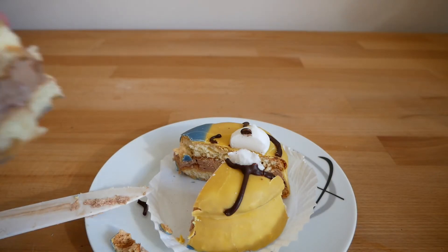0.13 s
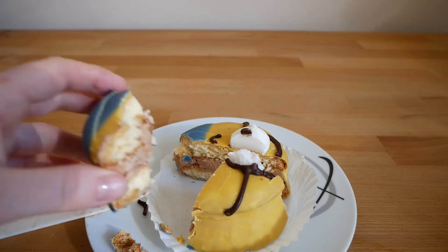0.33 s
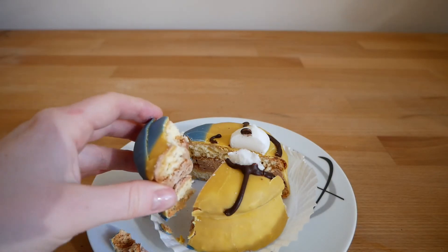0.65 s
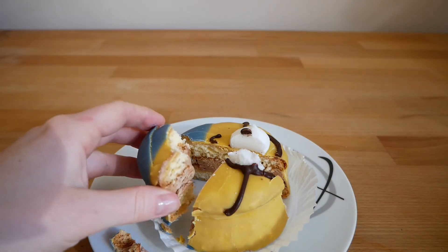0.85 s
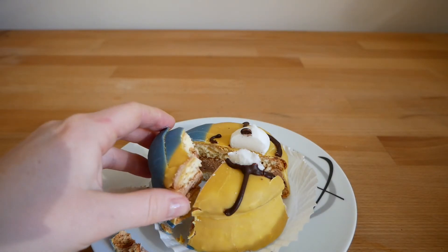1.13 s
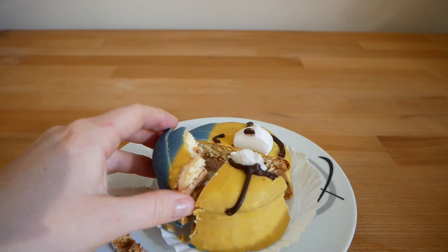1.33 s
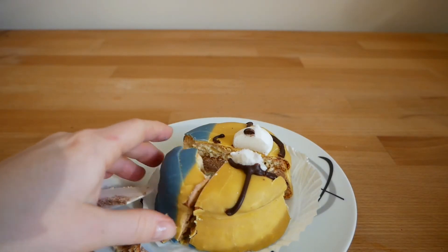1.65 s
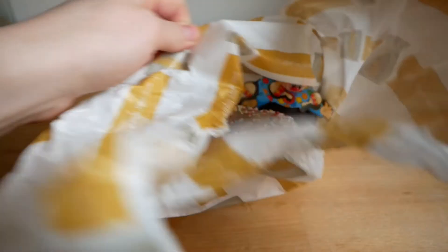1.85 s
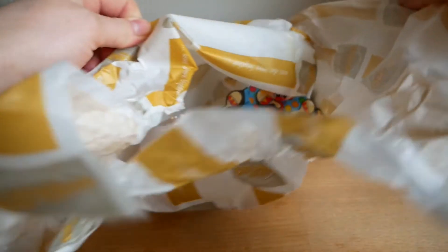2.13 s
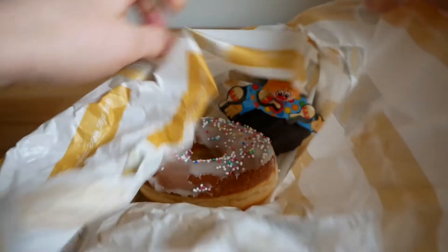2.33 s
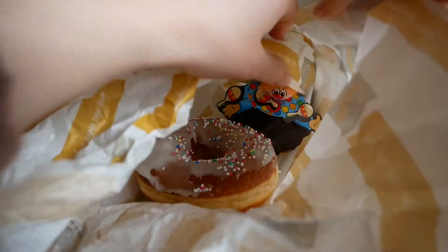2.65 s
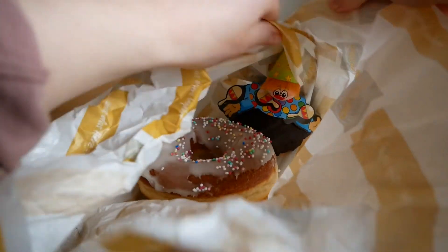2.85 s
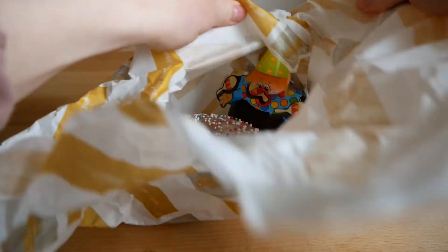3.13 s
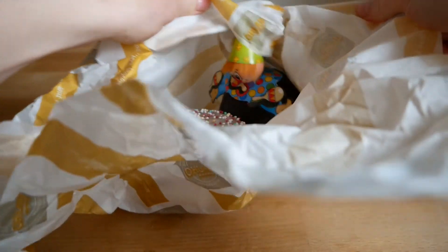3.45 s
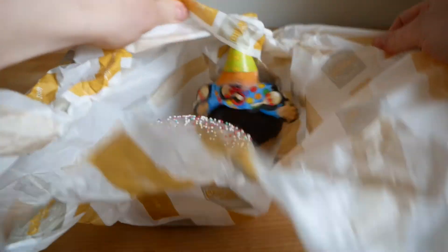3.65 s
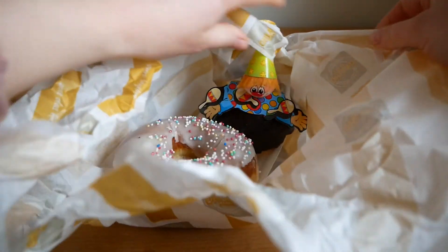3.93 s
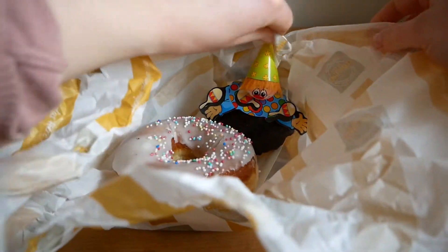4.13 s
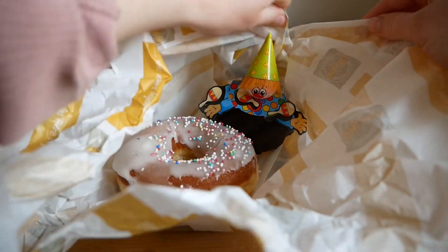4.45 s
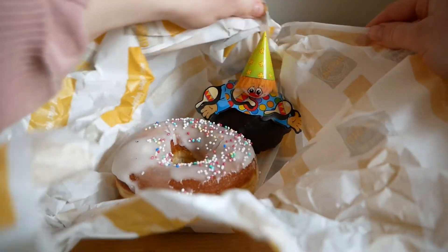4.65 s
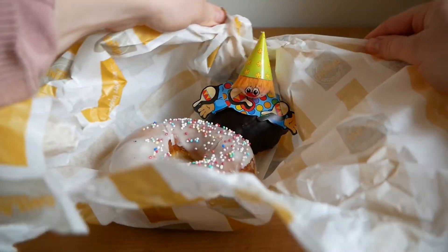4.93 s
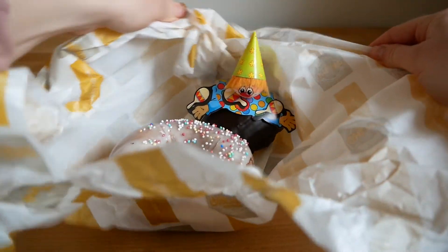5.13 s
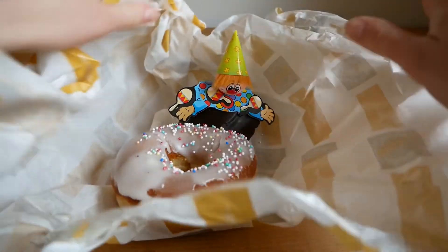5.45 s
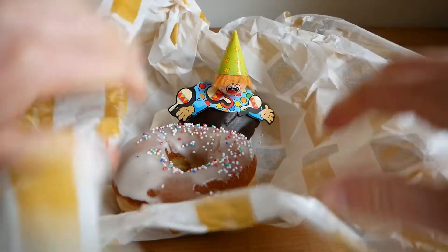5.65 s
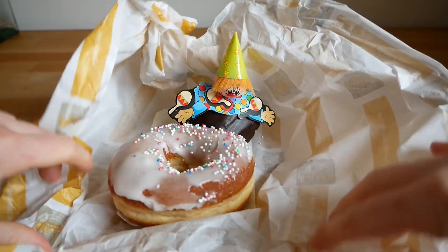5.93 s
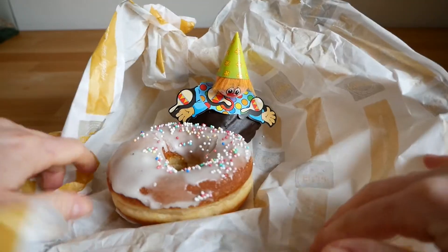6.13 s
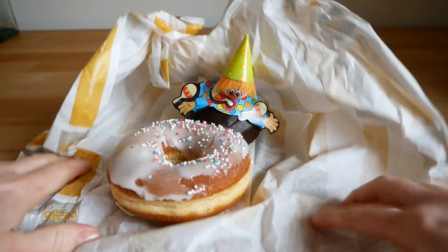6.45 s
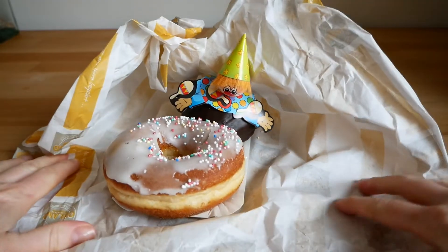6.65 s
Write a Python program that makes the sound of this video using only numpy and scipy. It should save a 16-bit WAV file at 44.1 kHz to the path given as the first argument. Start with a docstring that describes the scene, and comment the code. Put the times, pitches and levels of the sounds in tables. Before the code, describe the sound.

Near silence with faint hiss, then tiny taps and muted thuds on a plate, a light paper rustle and one hard, short knock. A much louder paper bag follows, crinkling almost without pause, surging and easing with each tug, with sharp fold pops and low puffs. Finally it is spread flat, sounding less hollow. Close stereo microphone, nearly centred, slight indoor reverberation.

```python
"""Quiet room tone and faint hiss, then a piece of cake is nudged about on a plate: soft modal thuds, whispers
of its paper case, and a sharp knock as it is set down on the plate in its paper case. Then two hands pull a
stiff paper bag open close by: swarms of enveloped noise-and-ring snaps crackle, larger folds pop, and panels
flutter and puff as low filtered noise. Decaying noise tails give the small room's answer."""
import sys
import numpy as np
from scipy import signal
from scipy.fft import rfft, irfft
from scipy.io import wavfile
from scipy.ndimage import uniform_filter1d

SR = 44100
rng = np.random.default_rng(int(sys.argv[2]) if len(sys.argv) > 2 else 0)


def materialize(psi):
    """Save the field psi as 16-bit PCM at rate SR to the path in sys.argv[1].

    A 1-D psi becomes a single channel; in a 2-D psi each row is a channel.
    """
    bounded = np.clip(np.atleast_2d(psi).T, -1, 1)
    quanta = np.round(bounded * 32767).astype(np.int16)
    wavfile.write(sys.argv[1], SR, quanta)


N = 299880
T = np.arange(N) / SR


def undb(db):
    """Decibel law: level in dB to amplitude ratio."""
    return 10 ** (np.asarray(db) / 20)


def unit(x):
    """Power normalisation: scale to rms 1."""
    return x / np.sqrt(np.mean(x ** 2))


def noise(size):
    """White noise: equal mean power at every frequency."""
    return rng.standard_normal(size)


def on_log(points, hz):
    """Logarithmic pitch scale: read (Hz, value) points on a log-frequency axis."""
    f, value = np.transpose(points)
    return np.interp(np.log(np.maximum(hz, 1)), np.log(f), value)


def colour(x, points, size=4096):
    """Minimum-phase filtering: a causal filter through (Hz, dB) points keeps the sharp fronts of clicks."""
    gain = undb(on_log(points, np.fft.rfftfreq(size, 1 / SR)))
    cepstrum = irfft(np.log(gain))
    # folding the cepstrum onto positive times makes the response causal
    cepstrum[1:size // 2] *= 2
    cepstrum[size // 2 + 1:] = 0
    response = irfft(np.exp(rfft(cepstrum)))
    return signal.fftconvolve(x, response)[:len(x)]


def band(x, hz, kind, order=2):
    """Butterworth filtering: a maximally flat passband."""
    cutoff = np.clip(hz, 10, .45 * SR)
    return signal.sosfilt(signal.butter(order, cutoff, kind, fs=SR, output="sos"), x)


def running_rms(x, span_s):
    """Short-time power: the root of the squared signal averaged twice over a span."""
    k = max(int(span_s * SR), 2)
    mean_square = uniform_filter1d(uniform_filter1d(x ** 2, k), k)
    return np.sqrt(np.abs(mean_square) + 1e-12)


def add(track, s, sound):
    """Superposition: mix a sound in at a time."""
    i = int(np.clip(s * SR, 0, N - 1))
    track[i:i + len(sound)] += sound[:N - i]


def wander(hz):
    """Random modulation: noise low-passed at hz, rms 1."""
    return unit(band(noise(N), hz, "low"))


# spectrum of the room tone, relative; columns: frequency_hz [Hz], level_db [dB]
AIR_SPECTRUM = [(12, -29), (20, 4), (113, -5.5), (248, -5), (337, -9), (624, -9.5), (698, -9), (897, -6),
                (1290, -14.5), (1530, -14), (1760, -16.5), (13900, -28.5), (16000, -35)]


def air():
    """Coherent and incoherent noise: room tone shared by both channels, with each channel's own faint hiss."""
    tone = undb(-60.5) * unit(colour(noise(N), AIR_SPECTRUM))
    hiss = np.array([unit(band(noise(N), 9000, "low", order=1)) for _ in range(2)])
    return tone + undb(-74.0) * hiss


# blows on plate and table; columns: start_s [s], body_db [dB], contact_crack_db [dB], brightest_mode_hz [Hz]
BLOWS = [(0.581, -48, -73, 300), (0.652, -54, -42, 1300), (0.725, -58, -45, 1800), (0.8955, -40, -49, 5000),
         (1.283, -48, -70, 320), (1.519, -48, -28, 3020), (1.5311, -52, -17, 9000), (1.535, -32, -12, 5000),
         (1.68, -55, -33, 1500), (1.718, -70, -29, 1200)]
# modes of plate and table, level relative; columns: frequency_hz [Hz], level_db [dB], t60_s [s]
PLATE_MODES = [(182, -28, 0.087), (250, -23, 0.076), (335, -7, 0.075), (368, -4, 0.064), (430, -12, 0.093),
               (546, -4.5, 0.11), (860, -3, 0.026), (1070, -21, .06), (1320, -8, 0.055), (2100, -10, .025),
               (2720, 2.5, 0.03), (3780, -1, .015), (4600, 0, 0.02), (5830, -2, 0.022)]


def plate(thud_db=-5, thud_s=0.028):
    """Modal excitation: a blow cracks, thuds and rings; soft contacts leave the high modes still."""
    out, t = np.zeros(N), T[:SR // 2]
    for start_s, body_db, crack_db, bright_hz in BLOWS:
        ring = np.zeros(len(t))
        for k, (hz, db, t60) in enumerate(PLATE_MODES):
            drive = undb(db) / (1 + (hz / bright_hz) ** 2)
            # neighbouring modes start with opposite sign
            ring += (-1) ** k * drive * np.sin(2 * np.pi * hz * t) * undb(-60 * t / t60)
        thud = unit(band(noise(len(t)), [160, np.clip(bright_hz, 200, 600)], "band"))
        thud = thud * np.exp(-t / thud_s)
        crack = noise(len(t)) * np.exp(-t / 0.001)
        crack = colour(crack, [(300, -11), (1500, 2), (2150, 11.5), (2700, -3.5),
                               (8500, 10), (11000, 0), (16000, 9)])
        crack = band(crack, 1.36 * bright_hz, "low", order=1)
        body = ring + undb(thud_db) * thud
        add(out, start_s, undb(body_db) * body + undb(crack_db) * crack)
    return out


# reverberation time of the room; columns: frequency_hz [Hz], t60_s [s]
REVERBERATION = [(150, 0.33), (600, 0.56), (2000, 0.058), (6000, 0.24), (14000, 0.2)]


def room(x, gap_s=0.0035):
    """Diffuse reverberation: after a short gap, reflections of a small room die away band by band."""
    t = T[:int(.7 * SR)]
    edges = np.geomspace(60, 18000, 9)
    tail = np.zeros(len(t))
    for lo, hi in zip(edges, edges[1:]):
        t60 = on_log(REVERBERATION, np.sqrt(lo * hi))
        tail += band(noise(len(t)), [lo, hi], "band", order=3) * undb(-60 * t / t60)
    tail = tail * (t > gap_s)
    return signal.fftconvolve(x, tail / np.sqrt(np.sum(tail ** 2)))[:N]


def snap(ring_hz, crack_s, ring_s, ring_db, size=500):
    """Buckling: a crease flips with a crack, the ring of its facet, and ripples running out in the sheet."""
    t = T[:size]
    ripples = .2 * np.exp(-t / .003)
    crack = noise(size) * (np.exp(-t / crack_s) + ripples)
    ring = np.sin(2 * np.pi * ring_hz * t) * np.exp(-t / ring_s)
    onset = 1 - np.exp(-t / 0.000085)
    return unit((unit(crack) + undb(ring_db) * unit(ring)) * onset)


def crackle(per_s, spread_db, rub_db, crack_s):
    """Crackling noise: snaps of every size and pitch at random, over the dull hiss of sliding paper."""
    out = np.zeros(N)
    for when, size, pitch, length in rng.random((int(per_s * N / SR), 4)):
        ring_hz = 900 + 13000 * pitch ** 1.4
        stretch = 3 ** (length - .5)
        # exponentially distributed sizes: many small snaps, few large ones
        db = spread_db * min(-np.log(1 - size), 3.4)
        # small facets ring high and briefly
        ring_s = stretch * 0.0021 * np.sqrt(2000 / ring_hz)
        add(out, when * N / SR, undb(db) * snap(ring_hz, crack_s * stretch, ring_s, ring_db=-5.5))
    # creases give way in bunches
    out = unit(out * undb(2 * wander(50)))
    rub = unit(band(noise(N), 5600, "low", order=1))
    return out + undb(rub_db) * rub


# paper takes up a movement over GRIP_SHARE of its length; on letting go it drops fast, then creaks out
GRIP_SHARE, LET_GO_S, CREAK_DB = 0.18, 0.0043, -5.5


def stroke(start_s, length_s, db, swell_db, creak_s):
    """Two-stage relaxation: a movement takes hold, swells or eases evenly in dB, lets go and creaks out."""
    done = (T - start_s) / length_s
    after = np.maximum(done - 1, 0) * length_s
    creak = undb(CREAK_DB)
    release = (1 - creak) * np.exp(-after / LET_GO_S) + creak * np.exp(-after / creak_s)
    grip = np.clip(done / GRIP_SHARE, 0, 1)
    return grip * undb(db + swell_db * (np.clip(done, 0, 1) - .5)) * release


# colour of hollow, crackling paper, relative; columns: frequency_hz [Hz], level_db [dB]
HOLLOW_PAPER = [(120, -38), (200, -9.5), (440, -6), (548, -1), (635, -3.5), (916, -3), (1040, -4.5),
                (1530, -3.5), (3560, -5), (6640, -8), (8420, -6), (10500, -14), (13600, -13), (16000, -24)]
# the cake's paper case brushing the plate, level halfway and its change from start to end;
# columns: start_s [s], length_s [s], level_db [dB], swell_db [dB]
CASE_BRUSHES = [(1.318, 0.045, -57.5, 4), (1.44, 0.04, -52, 7), (1.483, 0.012, -42.5, -1),
                (1.504, 0.19, -48.5, -5)]


def paper_case():
    """Friction noise: thin paper under the cake whispers as it is pressed."""
    creases = crackle(per_s=200, spread_db=1.2, rub_db=-4, crack_s=0.003)
    whisper = band(colour(creases, HOLLOW_PAPER), 1230, "high")
    pressure = sum(stroke(*row, creak_s=0.019) for row in CASE_BRUSHES)
    return whisper / running_rms(whisper, 0.018) * pressure


# tugs of the hands, crackle level halfway, its change from start to end, treble re crackle before a fixed trim;
# columns: start_s [s], length_s [s], level_db [dB], swell_db [dB], treble_db [dB]
HAND_TUGS = [(1.74, 0.06, -24.0, -4, -4.0), (1.791, 0.32, -23.5, -2, -3), (2.218, 0.22, -26, -2.5, -4.0),
             (2.617, 0.045, -26, 1.5, -6.5), (2.722, 0.14, -28.5, 12, -2), (2.91, 0.12, -25, 8, -3),
             (3.12, 0.21, -25.5, 3.5, -4.5), (3.385, 0.24, -24, 3, -2.5), (3.637, 0.39, -31.5, -11, -5.5),
             (4.018, 0.26, -30.5, 3, -3), (4.32, 0.49, -27.0, 7, -2.5), (4.8, 0.29, -26, 0.5, -3.5),
             (5.048, 0.34, -22, -9, -3.0), (5.521, 0.023, -28.5, -10, -4.5), (5.633, 0.35, -25.5, 10.5, -6),
             (6.011, 0.054, -29, 5.5, -3.5), (6.119, 0.24, -25.5, 4, -9), (6.356, 0.093, -26.5, 5, -5.5),
             (6.463, 0.078, -20, -3, -4.5), (6.578, 0.17, -23.0, -1.5, -4.5)]


def hands():
    """Energy summation: tugs under way give the effort (a gain) and, power-weighted, the treble (dB)."""
    shares = np.array([stroke(s, length, db, swell, creak_s=0.11) ** 2
                       for s, length, db, swell, _ in HAND_TUGS]) + 1e-18
    total = shares.sum(axis=0)
    treble_db = np.array(HAND_TUGS)[:, -1] @ shares / total
    return np.sqrt(total), treble_db


# colour of the paper once spread flat, relative; columns: frequency_hz [Hz], level_db [dB]
FLAT_PAPER_COLOUR = [(120, -33), (200, -6), (448, -6.5), (558, -2), (763, -4.5), (1160, 0), (1980, 0.5),
                     (2560, -1), (7970, -4.5), (10300, -9.5), (13800, -9), (16000, -23)]
# colour of the loose panels, relative; columns: frequency_hz [Hz], level_db [dB]
PANEL_COLOUR = [(20, -2), (45, 4), (90, -0.5), (180, -2.5), (250, -2.5), (350, -3.5), (600, -8.5),
                (1500, -78.5)]
ORDINARY_DB = -26  # effort of an ordinary tug
# flutter under an ordinary tug, its share of the effort's dB, and its change once the bag lies flat
FLUTTER_DB, FLUTTER_DB_PER_DB, FLAT_FLUTTER_DB = -38, 0.5, -1.5
OPEN_S = 5.78  # the bag begins to lie flat


def bag(effort, treble_db):
    """Driven crackling: effort sets the crackle, each tug has its own treble, and loose panels flutter."""
    swarm = crackle(per_s=440, spread_db=3.5, rub_db=-8.5, crack_s=0.0045)
    # spread flat, the bag loses its hollow ring
    flat = np.clip((T - OPEN_S) / 0.18, 0, 1)
    hollow_swarm = unit(colour(swarm, HOLLOW_PAPER))
    flat_swarm = unit(colour(swarm, FLAT_PAPER_COLOUR))
    swarm = (1 - flat) * hollow_swarm + flat * flat_swarm
    swarm = swarm / running_rms(swarm, .03)
    body = signal.sosfiltfilt(signal.butter(3, 5500, fs=SR, output="sos"), swarm)
    # the treble flickers at random, slower than about 16 Hz
    treble = unit((swarm - body) * undb(2.76 * wander(15.6)))
    crinkle = undb(-0.72) * unit(body) + undb(treble_db - 0.3) * treble
    # the panels lurch whenever the creases give way
    lurch = running_rms(swarm, 0.0037) ** 1.9
    flutter = unit(colour(noise(N) * lurch, PANEL_COLOUR))
    flutter_gain = undb(FLUTTER_DB + FLAT_FLUTTER_DB * flat)
    flutter_gain = flutter_gain * (effort / undb(ORDINARY_DB)) ** FLUTTER_DB_PER_DB
    return crinkle * effort + flutter * flutter_gain


# extra top octave of a big fold over a small crease; columns: frequency_hz [Hz], level_db [dB]
FOLD_TOP = [(8500, 0.5), (12000, 3)]
# spectral tilt is nil at NEUTRAL_HZ and grows by this many dB per octave for each octave above it
NEUTRAL_HZ, TILT_PER_OCTAVE = 2400, 0.81


def pop(ring_hz, size=1024):
    """Snap-through: a long fold gives way at once, brighter for small, high facets; rms 1 over 4 ms."""
    tilt_db = TILT_PER_OCTAVE * np.log2(ring_hz / NEUTRAL_HZ)
    shade = [(hz, db + on_log(FOLD_TOP, hz) + tilt_db * np.log2(max(hz, 600) / 3000))
             for hz, db in HOLLOW_PAPER]
    click = snap(ring_hz, crack_s=0.00096, ring_s=0.0015, ring_db=-7.5)
    click = colour(np.pad(click, (0, size)), shade, size=size)
    return click / np.sqrt(np.sum(click ** 2) / (.004 * SR))


# big folds that pop through, level before the common pop_db;
# columns: start_s [s], level_db [dB], facet_ring_hz [Hz]
BIG_FOLDS = [(1.761, -16.5, 8500), (1.848, -18, 7400), (1.8657, -15, 6500), (1.8912, -19, 2030),
             (1.919, -15.5, 2270), (2.0266, -26, 1900), (2.1422, -16, 1130), (2.2103, -23.5, 8100),
             (2.333, -19.5, 8000), (2.3779, -24, 5000), (2.447, -19, 8460), (2.6234, -31, 1100),
             (2.639, -23, 3120), (2.6627, -15.5, 4340), (2.7958, -20.5, 9140), (2.8147, -17, 3620),
             (2.8652, -18.5, 2130), (2.9424, -15.5, 5760), (2.9551, -15.5, 1850), (3.0616, -15, 3600),
             (3.1374, -18, 8600), (3.1898, -16.5, 3700), (3.2386, -12.5, 3730), (3.2818, -15.5, 4900),
             (3.4835, -10.5, 1530), (3.4887, -16.5, 1200), (3.5931, -18, 2800), (3.6449, -16.5, 1080),
             (3.7669, -21.5, 8400), (3.868, -23, 8400), (3.9962, -25, 3740), (4.076, -17.5, 5000),
             (4.115, -19.5, 1370), (4.2236, -13, 8200), (4.3591, -18.5, 8100), (4.406, -18, 8650),
             (4.4827, -15.5, 8300), (4.5567, -15.5, 3570), (4.7735, -17, 9150), (4.9067, -17.5, 7760),
             (4.9561, -18.5, 8900), (5.206, -16, 8800), (5.303, -20, 4270), (5.3596, -27, 8100),
             (5.6231, -23, 8700), (5.8864, -15, 1330), (5.9278, -17, 2370), (6.113, -25, 7060),
             (6.185, -17, 1830), (6.2239, -15.5, 3830), (6.3158, -17, 3830), (6.6831, -15.5, 7150)]
# neighbouring creases go just before and after a big fold: how early, how late, level re the effort
RUN_EARLY_S, RUN_LATE_S, RUN_DB = 0.002, 0.009, -2
FOLDS_PER_S, FOLD_DB_PER_DB = 14, 0.5  # lesser folds: rate, and share of the effort's dB they follow


def pops(effort, pop_db=0.6, count=2):
    """Cascaded buckling: big folds take neighbours along, louder under more effort; lesser folds fall between."""
    out = np.zeros(N)
    for s, db, ring_hz in BIG_FOLDS:
        add(out, s, undb(db + pop_db) * pop(ring_hz))
        for lag in rng.uniform(-RUN_EARLY_S, RUN_LATE_S, count):
            add(out, s + lag, effort[int(s * SR)] * undb(RUN_DB) * pop(ring_hz))
    for when, strength, pitch in rng.random((int(FOLDS_PER_S * N / SR), 3)):
        pull = (effort[int(when * N)] / undb(ORDINARY_DB)) ** FOLD_DB_PER_DB
        # level under an ordinary tug
        fold_db = -25.5 + 2 * strength
        add(out, when * N / SR, pull * undb(fold_db) * pop(1300 * 7 ** pitch))
    return out


# whole panels flipping over, level before the common flap_db; columns: start_s [s], level_db [dB]
PANEL_FLIPS = [(1.964, -21.5), (2.269, -27.5), (2.45, -29), (2.865, -27), (4.349, -34), (4.779, -30),
               (5.2, -22), (5.925, -28.5), (5.969, -29), (6.269, -27.5)]


def flaps(flap_db=-1, rise_s=0.0036, fall_s=0.0095, lowest_hz=50):
    """Volume displacement: a panel that flips over pushes a short, dull puff of air."""
    out, t = np.zeros(N), T[:SR // 8]
    for s, db in PANEL_FLIPS:
        push = noise(len(t)) * (1 - np.exp(-t / rise_s)) * np.exp(-t / fall_s)
        puff = band(colour(push, PANEL_COLOUR), lowest_hz, "high")
        # the level is the rms over 15 ms
        puff = puff / np.sqrt(np.sum(puff ** 2) / (.015 * SR))
        add(out, s, undb(db + flap_db) * puff)
    return out


# stereo width, side re mid; columns: frequency_hz [Hz], side_db [dB]
STEREO_WIDTH = [(100, -21.5), (1500, -27), (3500, -27), (6000, -20), (9500, -18.5), (14000, -8.5)]


def widen(x):
    """Mid-side stereo: a randomly varying side signal widens the sound, most in the treble."""
    gain = undb(on_log(STEREO_WIDTH, np.fft.rfftfreq(N, 1 / SR)))
    scattered = x * np.sqrt(2) * np.sin(3 * wander(140))
    side = irfft(rfft(scattered) * gain, N)
    return np.array([x + side, x - side])


def scene():
    """Superposition of direct sound, reflections and room tone."""
    table = plate()
    effort, treble_db = hands()
    paper = paper_case() + bag(effort, treble_db) + pops(effort) + flaps()
    # as the bag turns it throws its sound at different walls, 1.088 turns a second
    turn = 2 * np.pi * 1.088 * T
    paper_walls = room(paper * np.cos(turn)) + room(paper * np.sin(turn))
    sound = paper + table + undb(-16) * paper_walls + undb(-12.5) * room(table)
    return widen(sound) + air()


def record(dry):
    """Soft saturation and band limiting: round the tallest peaks and cut the top above 15.9 kHz."""
    held = dry / (1 + dry ** 6) ** (1 / 6)
    return signal.sosfilt(signal.ellip(8, .2, 70, 15900, fs=SR, output="sos"), held)


dry = scene()
out = record(dry)
materialize(out)
```